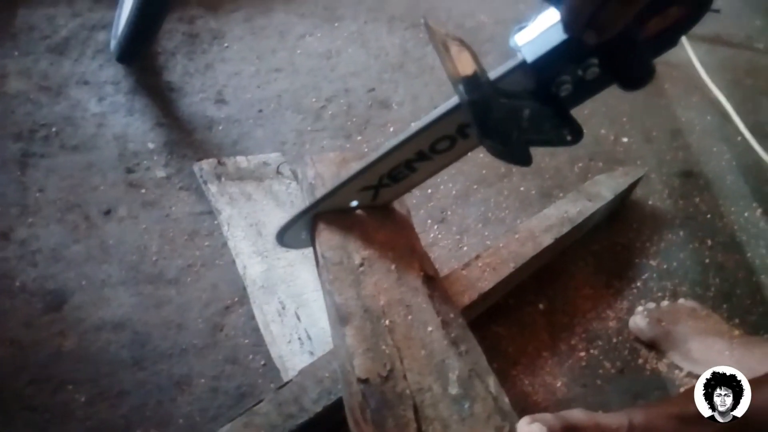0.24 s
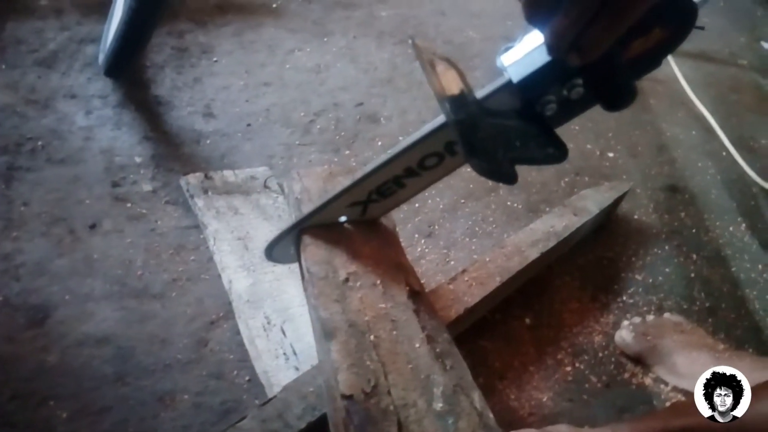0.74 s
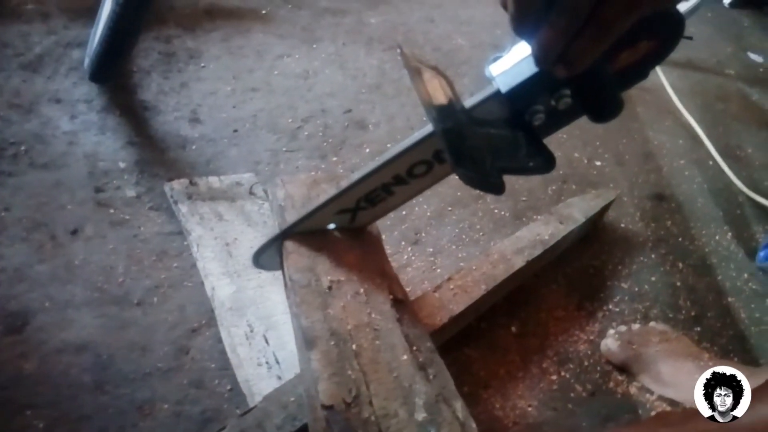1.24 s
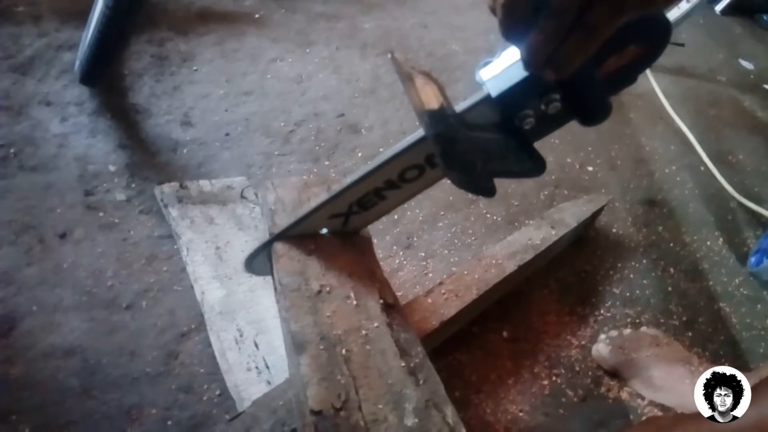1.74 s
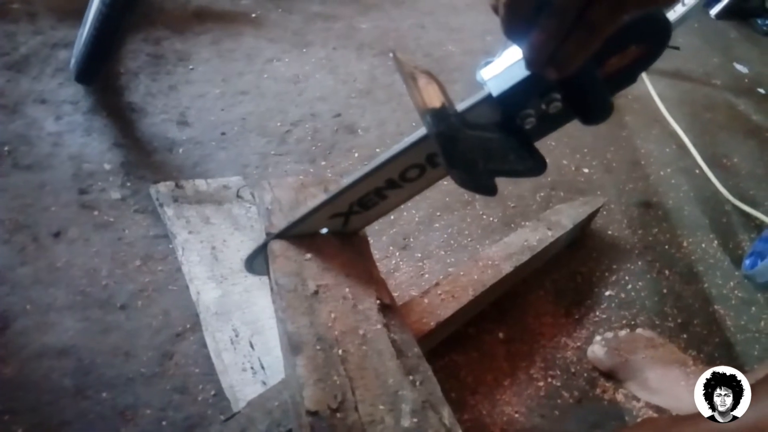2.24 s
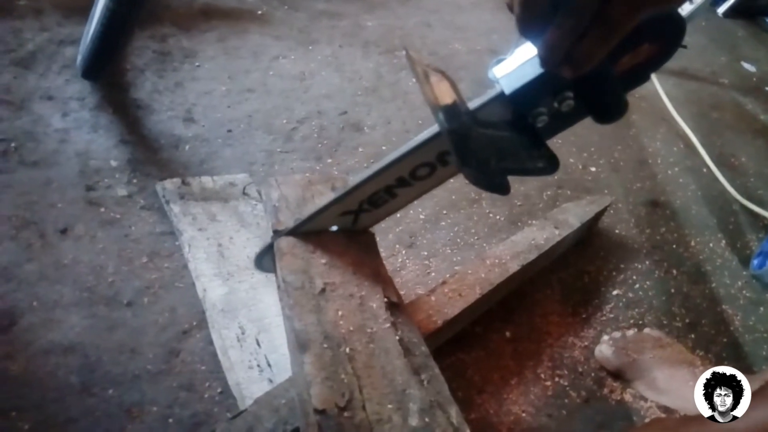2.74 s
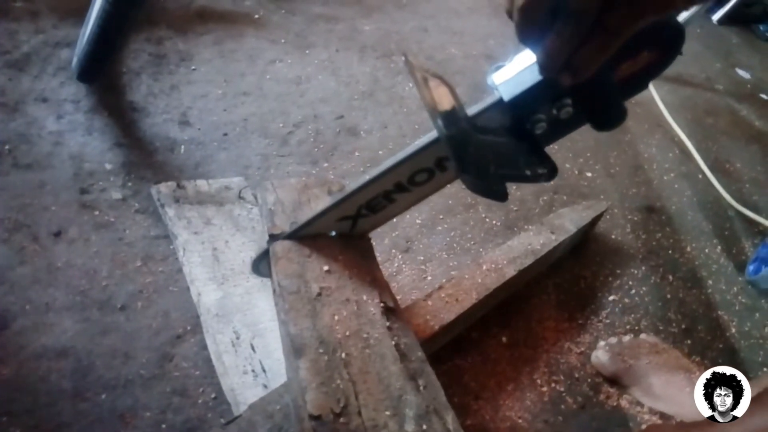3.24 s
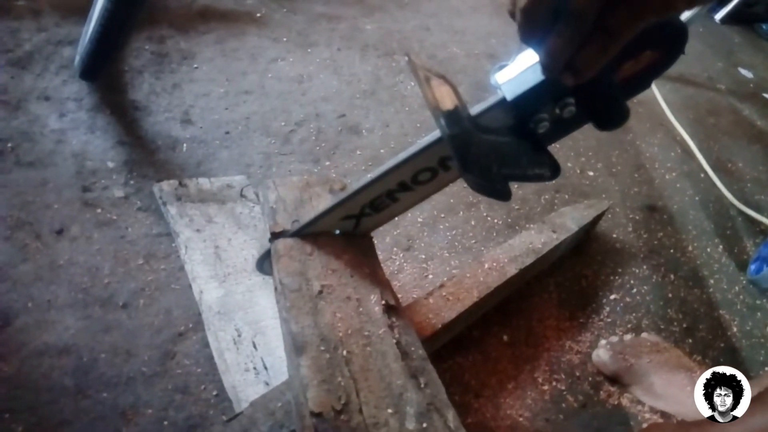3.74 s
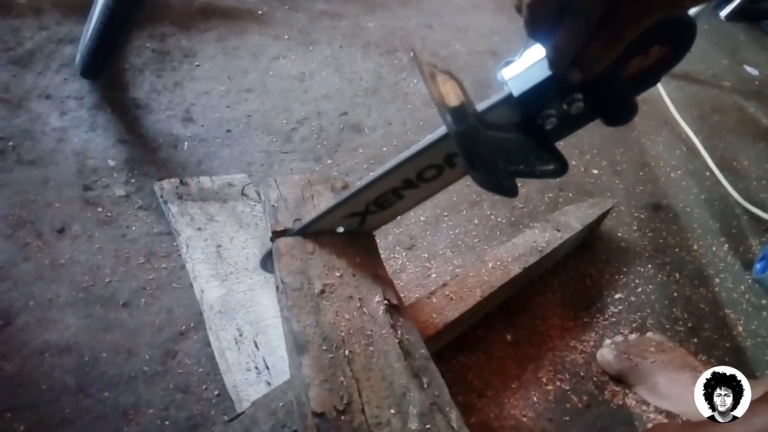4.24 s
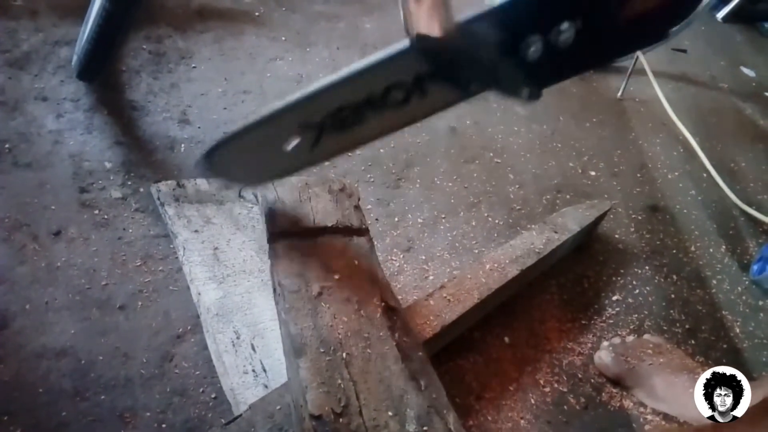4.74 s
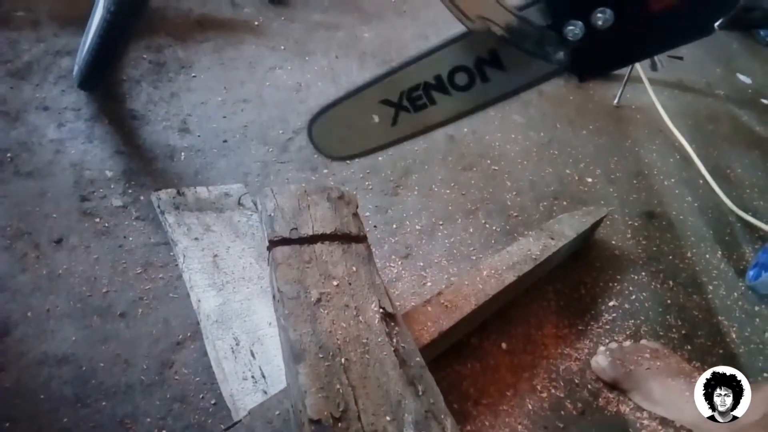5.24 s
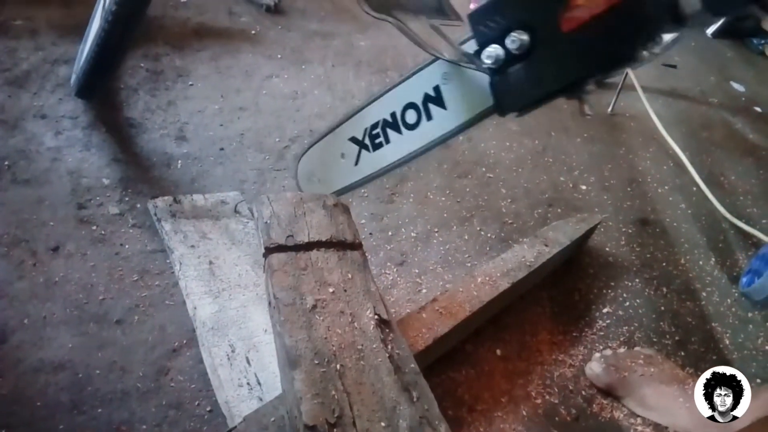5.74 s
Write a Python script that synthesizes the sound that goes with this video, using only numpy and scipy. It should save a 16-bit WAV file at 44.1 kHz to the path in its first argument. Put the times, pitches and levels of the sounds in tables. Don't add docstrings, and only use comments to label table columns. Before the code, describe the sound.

Loud, gritty buzzing of a motor-driven saw chain in wood, with low airy thumps on the right, turning to a smoother, brighter free-running whine.

```python
import sys
import numpy as np
from scipy import signal
from scipy.fft import rfft, irfft, next_fast_len
from scipy.io import wavfile
from scipy.ndimage import uniform_filter1d, minimum_filter1d, map_coordinates

SR = 44100
rng = np.random.default_rng(int(sys.argv[2]) if len(sys.argv) > 2 else 0)


def linear_from_db(decibels):
    return 10 ** (np.asarray(decibels, float) / 20)


def generate_wav(sig):
    pcm = np.round(np.clip(np.atleast_2d(sig).T, -1, 1) * 32767).astype(np.int16)
    wavfile.write(sys.argv[1], SR, pcm)


N = 264600


def unit(x):
    return x / np.sqrt(np.mean(x ** 2) + 1e-20)


def along(points, hz, order=1):
    rows = np.transpose(points)
    return np.interp(np.log(hz + 1), np.log(rows[0] + 1), rows[order])


def curves(rows):
    s, *columns = np.transpose(rows)
    return [np.interp(np.arange(N) / SR, s, column) for column in columns]


def bell(center_s, width_s):
    return np.exp(-((np.arange(N) / SR - center_s) / width_s) ** 2)


def wobble(rate):
    knots = rng.standard_normal(int(N * rate / SR) + 4)
    return map_coordinates(knots, [np.arange(N) * rate / SR])


def filtered(x, response):
    m = next_fast_len(N + 8192)
    return irfft(rfft(x, m) * response(np.fft.rfftfreq(m, 1 / SR)), m)[..., :N]


def narrow(hz, width):
    carrier = np.exp(2j * np.pi * np.cumsum(hz + np.zeros(N)) / SR)
    return unit(np.real(carrier * (wobble(width) + 1j * wobble(width))))


# time in seconds, share out of the cut from 0 to 1.
LIFT_PATH = [
    (0, 0.11),
    (4.45, 0.2),
    (4.9, 0.7),
    (6, 0.66),
]


def bar_out():
    out, = curves(LIFT_PATH)
    return out


def bounce():
    lap = 1.28 * narrow(20, 8)
    contact = (0.5 - 0.86 * bar_out()) * (0.76 * wobble(45) + lap)
    return linear_from_db(contact + 0.75 * wobble(90))


def link_blows():
    link_hz, scatter, burst_s, spread_db = 568, 0.35, 0.00075, 4.5
    count = int(N / SR * link_hz)
    luck = rng.standard_normal((count, 2))
    at = ((np.arange(count) + scatter * luck[:, 0]) * SR / link_hz).astype(int)
    blows = np.bincount(np.clip(at, 0, N - 1), linear_from_db(spread_db * luck[:, 1]), N)
    bursts = signal.lfilter([1], [1, -np.exp(-1 / (burst_s * SR))], blows)
    return unit(bursts) * rng.standard_normal((2, N))


def fan_rush():
    z = signal.stft(rng.standard_normal((2, N)), nperseg=512)[2]
    patches = uniform_filter1d(rng.standard_normal(z.shape), 4, axis=1)
    patches = uniform_filter1d(patches, 6, axis=2)
    rush = signal.istft(z * linear_from_db(2.0 * unit(patches)), nperseg=512)[1]
    return unit(rush[:, :N])


def ridges(x, depth_db):
    z = signal.stft(x, nperseg=1024)[2]
    field = uniform_filter1d(rng.standard_normal(z.shape), size=3, axis=1)
    field = uniform_filter1d(field, size=40, axis=2)
    return unit(signal.istft(z * linear_from_db(depth_db * unit(field)), nperseg=1024)[1][:, :N])


# frequency in Hz, left-right likeness from 0 to 1.
COHERENCE = [(300, 0.74), (700, 0.72), (900, 0.42), (1200, 0.73), (1500, 0.028), (5500, 0.05), (6200, 0.37),
             (7200, 0.033)]


def cohere(a, b):
    def like(hz):
        return np.clip(along(COHERENCE, hz), 0, 0.99)

    shared = filtered(a, like)
    separate = filtered(b, lambda hz: np.sqrt(1 - like(hz) ** 2))
    return np.array([a, shared + separate])


# frequency in Hz, cutting level and free level in dB per Hz.
LEFT_SPECTRUM = [(60, -33, -38), (377, -26, -27), (460, -19.5, -22), (1340, -7, -8), (1460, -13, -5),
                 (2720, -5.5, -4), (5590, 0.5, 4.5), (6180, 6.5, 9), (7420, -2, -0.5), (8980, -13, -12.5),
                 (11040, -18.5, -16), (12900, -30, -30), (13700, -35, -30), (14400, -27, -24)]
# frequency in Hz, cutting level and free level in dB per Hz.
RIGHT_SPECTRUM = [(60, -41, -29), (380, -17.5, -45), (500, -17, -19), (970, -14, -10), (1300, -5.5, -4.5),
                  (2214, -6, -8), (2386, 2.5, -9), (3060, 1.5, 6), (4110, -3.5, -3.5), (5450, -7.5, -9),
                  (5960, 1, -2.5), (8000, -13.5, -15.5), (9600, -12.5, -21), (10800, -14, -22)]
# frequency in Hz, gain in dB.
PORT_RESONANCE = [(1500, 0), (1700, -3), (1900, 0), (8800, 1), (9300, -2), (10400, 1), (11600, -2),
                  (12600, 1), (13150, 1), (13650, -3), (14000, 0), (14600, 10), (14900, 6), (15500, 6)]


def at_ports(pair):
    def heard(column):
        def response(hz):
            right_db = along(RIGHT_SPECTRUM, hz, column) + along(PORT_RESONANCE, hz)
            return linear_from_db([along(LEFT_SPECTRUM, hz, column), right_db])
        return filtered(pair, response)

    out = bar_out()
    return (1 - out) * heard(1) + out * heard(2)


# time in seconds, turn from 0 to 1.
SWING = [
    (0, 0.27),
    (1, 0.24),
    (2, .35),
    (4, 0.5),
    (4.6, 0.72),
    (6, 0.94),
]
# time in seconds, lift in dB.
CHAIN_SNAGS = [
    (2.385, 3.9),
    (2.775, 3.4),
    (3.03, 2.3),
    (5.99, 3.5),
]


def chain(chatter):
    share = 0.56
    white = chatter * (share * link_blows() + np.sqrt(1 - share ** 2) * fan_rush())
    heard = at_ports(ridges(cohere(*white), depth_db=1.8))
    turn, = curves(SWING)
    hiss_db, pan_db = 4.5 * turn, 1.1 - 3.5 * turn
    ring_db = -1 + 1.5 * bell(3, 2.47)
    rattle_db = -37 + 0.47 * wobble(8.9)
    rattle_db = rattle_db + sum(db * bell(s, 0.0078) for s, db in CHAIN_SNAGS)
    low = filtered(heard, lambda hz: hz < 4800)
    below_hiss = filtered(heard, lambda hz: hz < 8500)
    moved = low + linear_from_db(ring_db) * (below_hiss - low) + linear_from_db(hiss_db) * (heard - below_hiss)
    return linear_from_db(rattle_db + 8.5 + pan_db * [[0.5], [-0.5]]) * moved


# frequency in Hz, width in Hz, left level and right level in dB.
BAR_MODES = [(1185, 80, -62, -63), (1570, 50, -67, -69), (6127, 45, -47.5, -57), (6600, 160, -56, -65),
             (2990, 220, -64, -58.5), (3600, 100, -61, -63)]


def bar_ring(chatter):
    return chatter * sum(linear_from_db([[l], [r]]) * narrow(hz, width) for hz, width, l, r in BAR_MODES)


# time in seconds, lift in dB.
KERF_SWELLS = [
    (2.03, 8.6),
    (2.72, 8.4),
    (4.05, 6.2),
]


def kerf_whistle(chatter):
    since = np.arange(N) / SR - 1.8
    rise_s = 0.15
    sinking_hz = np.maximum(737 - 72 * since, 576)
    slot_hz = np.where(since < 0, 528, sinking_hz)
    deep = np.clip(since / rise_s, 0, 1) * linear_from_db(-65 - 2.5 * since)
    shallow = np.clip(-since / rise_s - 1, 0, 1) * linear_from_db(-71)
    swell_db = 2.5 * wobble(14) + sum(db * bell(s, 0.18) for s, db in KERF_SWELLS)
    slot = (deep + shallow) * linear_from_db(swell_db) * narrow(slot_hz, 85)
    return chatter * slot * linear_from_db([[0], [-4]])


# frequency in Hz, level in dB per Hz.
AIR_SPECTRUM = [(20, -42), (50, -5.5), (100, 1), (220, 4), (500, -2), (900, -10), (1600, -14), (3000, -61)]


def port_turbulence(force_db):
    excess_db = force_db - force_db.mean()
    air = filtered(rng.standard_normal((2, N)), lambda hz: linear_from_db(along(AIR_SPECTRUM, hz)))
    air = air / np.abs(uniform_filter1d(air ** 2, size=900) + 1e-20) ** 0.35
    deep = filtered(air, lambda hz: hz < 90)
    bright = filtered(air, lambda hz: hz > 450)
    shifted = air + (linear_from_db(0.18 * excess_db) - 1) * bright + (linear_from_db(-0.6 * excess_db) - 1) * deep
    return linear_from_db(force_db) * shifted / air.std()


# time in seconds, peak in dB, length in seconds.
AIR_GUSTS = [(0.063, -44.5, 0.07), (0.18, -50.5, 0.14), (0.31, -48.7, 0.031), (0.432, -50, 0.13),
             (0.736, -51.5, 0.14), (1.013, -45.5, 0.12), (1.184, -44.5, 0.08), (1.326, -51, 0.094),
             (1.49, -43, 0.12), (1.69, -43.5, 0.089), (1.858, -44.5, 0.052), (2.01, -49, 0.17),
             (2.142, -47, 0.084), (2.294, -48, 0.088), (2.387, -46, 0.032), (2.543, -53, 0.041),
             (2.73, -51.5, 0.14), (2.916, -46, 0.17), (3.102, -45.5, 0.067), (3.264, -49.5, 0.074),
             (3.38, -47.5, 0.12), (3.486, -43, 0.02), (3.65, -42, 0.021), (3.773, -48.5, 0.13),
             (3.902, -43, 0.015), (4.012, -49, 0.062), (4.295, -48.5, 0.14), (4.542, -46.5, 0.076),
             (4.598, -40, 0.03), (4.74, -50, 0.061)]
# time in seconds, depth in dB, length in seconds.
AIR_LULLS = [(0.56, 19, .04), (1.538, 13, .02), (1.695, 21, 0.024), (2.065, 10, 0.022), (2.207, 6, .025),
             (2.348, 17, .02), (2.435, 16, .06), (3.612, 1, .04), (3.924, 10, 0.035), (4.218, 14, 0.03),
             (4.577, 13, .02), (4.663, 1, 0.055)]


def draught():
    t = np.arange(N) / SR
    power = linear_from_db(2 * (-52.5 - 0.54 * t))
    for s, db, length in AIR_GUSTS:
        near = slice(max(round((s - 0.15) * SR), 0), round((s + 0.15) * SR))
        power[near] += linear_from_db(2 * db) * np.exp(-np.abs((t[near] - s) / (0.45 * length)) ** 3)
    eddies_db = 3 * wobble(55) + 2.34 * wobble(120)
    lulls_db = sum(db * bell(s, 0.53 * length) for s, db, length in AIR_LULLS)
    force_db = 10 * np.log10(power) + eddies_db - lulls_db
    facing = np.clip((4.86 - t) / 0.031, 0, 1)
    return facing * port_turbulence(force_db) * linear_from_db([[-27], [0]])


# frequency in Hz, left level and right level in dB.
MOTOR_TONES = [(462, -73, -73), (925, -67, -62), (1270, -66, -60), (1701, -62, -60), (5103, -56, -61),
               (5673, -55, -62)]


def motor_whine(chatter):
    t = np.arange(N) / SR
    free = linear_from_db(2.5) * (1 - np.exp(-np.maximum(t - 4.85, 0) / 0.45))
    tones = 0
    for hz, l, r in MOTOR_TONES:
        tone = np.sin(2 * np.pi * hz * t) + 0.5 * narrow(hz, 15)
        tones = tones + linear_from_db([[l], [r]]) * tone
    return chatter * free * tones


def scene():
    chatter = bounce()
    tool = chain(chatter) + bar_ring(chatter) + kerf_whistle(chatter) + motor_whine(chatter)
    return tool + draught()


# frequency in Hz, left and right threshold in dB relative to the average.
GATE_THRESHOLD = [(1500, -7, -7), (2200, -4.5, -4.5), (3000, -8, -8), (7000, -7, -7), (9500, -3.3, -3.3),
                  (11700, -2.5, -3.5), (13700, 0, -4.5), (15250, -3, -7)]


def thin(x):
    hz, _, z = signal.stft(x, SR, window="cosine", nperseg=2048)
    power = np.abs(uniform_filter1d(np.abs(z) ** 2, size=7, axis=1)) + 1e-20
    power = np.abs(uniform_filter1d(power, size=2, axis=2))
    average_db = uniform_filter1d(10 * np.log10(power.mean(axis=2)), size=70, axis=1)
    limit_db = average_db + [along(GATE_THRESHOLD, hz, 1), along(GATE_THRESHOLD, hz, 2)]
    luck = rng.standard_normal((2, 33, z.shape[2]))
    sway_db = 2 * np.repeat(luck, 32, axis=1)[:, :len(hz)]
    audible = power > linear_from_db(2 * (limit_db[..., None] + sway_db))
    keep = audible | (hz < 1400)[:, None]
    return signal.istft(z * keep, SR, window="cosine", nperseg=2048)[1][:, :N]


def roll_off(x):
    return signal.sosfilt(signal.butter(12, 16830, fs=SR, output="sos"), x)


def record(dry):
    envelope = np.abs(signal.hilbert(dry))
    peaks = -minimum_filter1d(-envelope, size=41)
    over = uniform_filter1d(peaks, size=41) / 0.095
    held = dry / (1 + over ** 4) ** 0.25
    held = held * linear_from_db(0.6 * np.cos(2 * np.pi * (np.arange(N) - 875) / 1024))
    finished = thin(filtered(held, lambda hz: hz < 15530))
    return roll_off(finished)


dry = scene()
out = record(dry)
generate_wav(out)
```